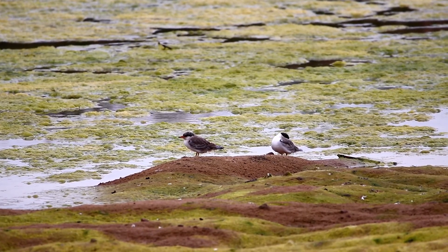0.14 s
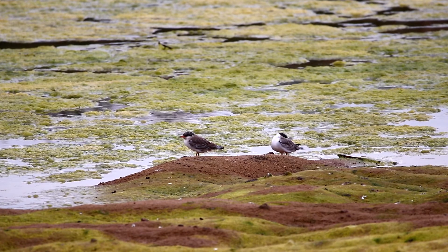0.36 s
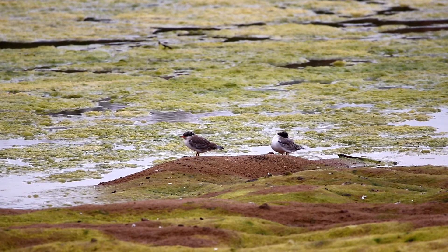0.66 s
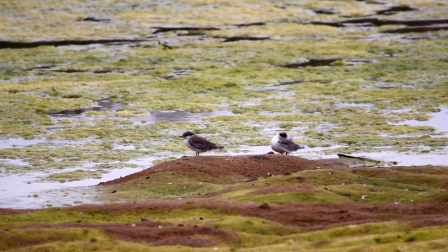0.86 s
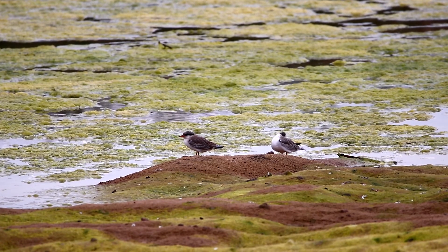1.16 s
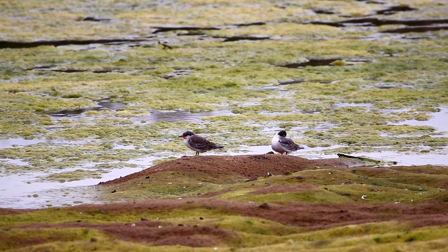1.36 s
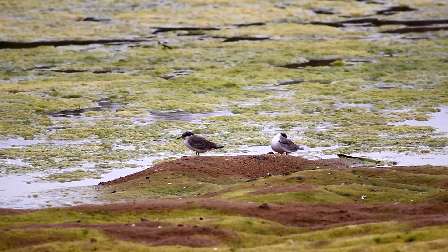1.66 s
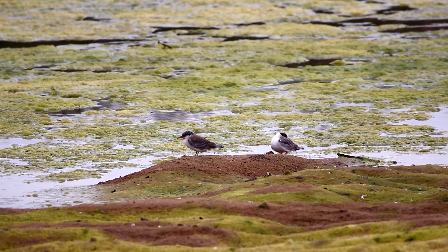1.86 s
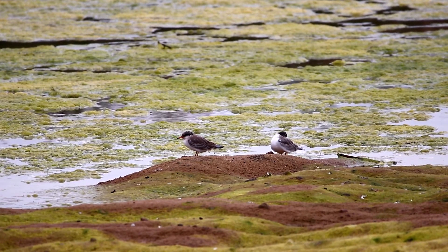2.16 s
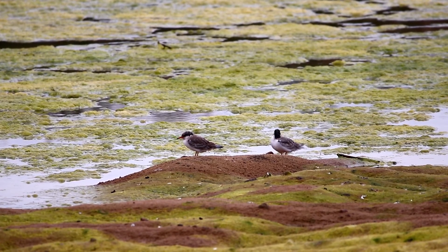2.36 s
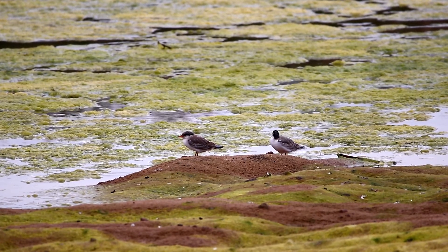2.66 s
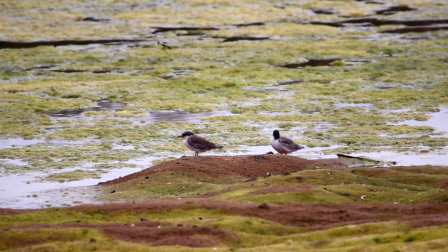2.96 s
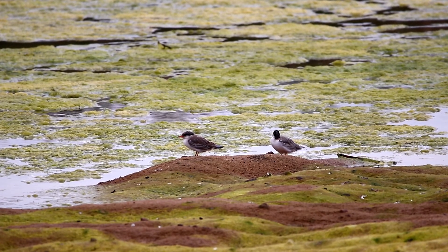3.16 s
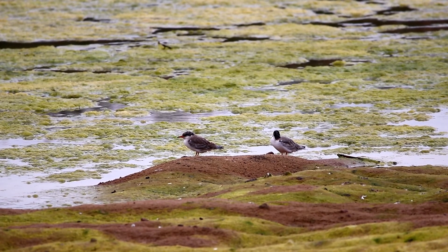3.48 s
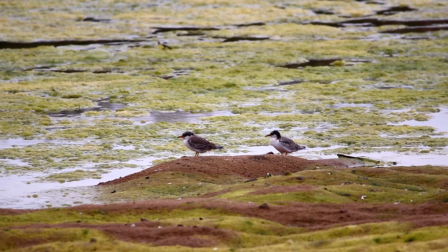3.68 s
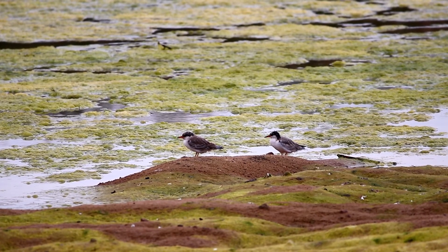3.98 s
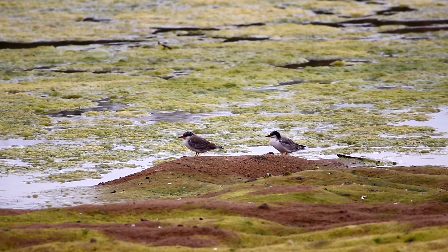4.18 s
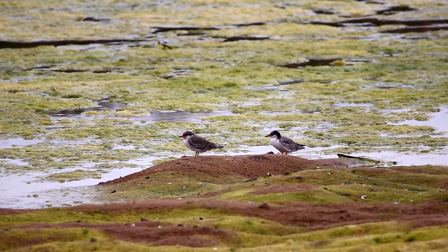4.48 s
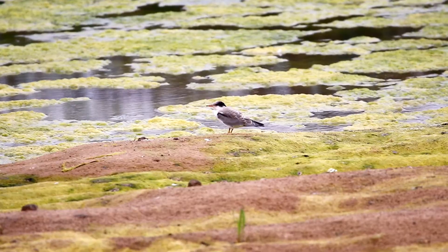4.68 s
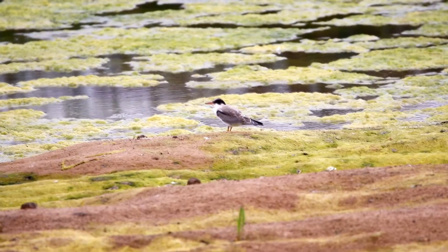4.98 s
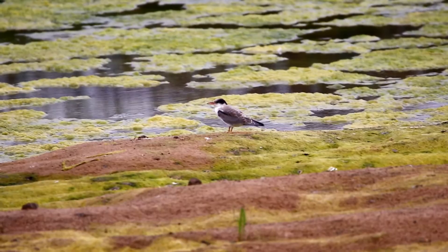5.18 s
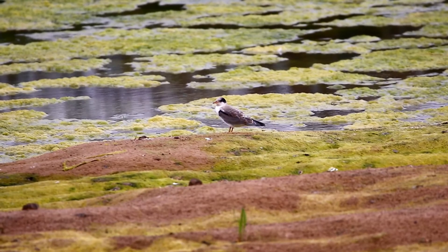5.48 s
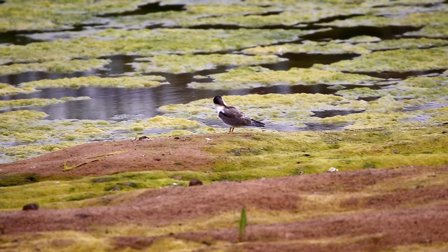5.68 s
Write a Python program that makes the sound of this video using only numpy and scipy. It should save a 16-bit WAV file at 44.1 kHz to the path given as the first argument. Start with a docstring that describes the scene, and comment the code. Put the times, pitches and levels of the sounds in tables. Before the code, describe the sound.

From the start, strong wind buffets the microphone: a deep ragged rumble with fluttering and dull thumps, heaviest during the first 1.5 seconds and leaning left as it eases after 3 seconds. Through it, several terns on a shallow, weedy lagoon call constantly and overlap, with very short notes under a tenth of a second, rising slightly then falling or cracking downward, some clear, some rasping, mostly slightly right, with one clearer bird left. Two faint thin whistles come near 1.4 seconds. At about 4.6 seconds the wind abruptly drops, exposing faint open-air hiss and light echo from the shore. A wavering cry starts at 4.7, with a close scrape and hollow snap around 4.75 and tiny ticks at 4.86. Growls and a short croak follow around 4.9 to 5.7, among more chirps. Small soft wind puffs flick left and right from 5.1 until the end near 6 seconds.

```python
"""Wind buffeting two microphone ports is heard first, with terns calling at once over a shallow lagoon.
The calls are harmonic stacks: short arched notes that fall or crack, whistles, a cry, a croak and growls.
The wind is shaped noise with thumps; it drops away after four and a half seconds and returns in small puffs.
In the lull come close clicks, noise bursts ringing a hollow body, over a faint open-air hiss."""
import sys
import numpy as np
from scipy import signal
from scipy.fft import rfft, irfft
from scipy.io import wavfile
from scipy.ndimage import uniform_filter1d, map_coordinates

SR = 44100
rng = np.random.default_rng(int(sys.argv[2]) if len(sys.argv) > 2 else 0)


def wav_out(sig):
    """Save sig, one row per channel (or a flat mono array), as 16-bit PCM at SR to the path in sys.argv[1]."""
    wavfile.write(sys.argv[1], SR, np.round(np.clip(np.atleast_2d(sig).T, -1, 1) * 32767).astype(np.int16))


N = 257544
T = np.arange(N) / SR
TOP_HZ = 15700


def undb(db):
    """Decibels to gain."""
    return 10 ** (np.asarray(db) / 20)


def unit(x):
    """Scale to rms 1."""
    return x / np.sqrt(np.mean(x ** 2) + 1e-18)


def gain_at(hz, points):
    """Gain of a (f/Hz, level/dB) spectrum at any frequency, interpolated over log frequency."""
    f, db = np.transpose(points)
    return undb(np.interp(np.log(hz + 1e-3), np.log(f), db))


def noise(points, size=N, weight=lambda hz: 1):
    """Noise of a given colour, rms 1."""
    hz = np.fft.rfftfreq(size, 1 / SR)
    spectrum = rfft(rng.standard_normal(size)) * gain_at(hz, points) * weight(hz)
    return unit(irfft(spectrum, size))


def wobble(rate_hz, size=N):
    """Smooth random curve with a spread near 1: a spline through rate_hz random points a second."""
    place = np.arange(size) * rate_hz / SR
    return map_coordinates(rng.standard_normal(size // 8 + 4), [place], order=3, mode="wrap")


def decay(t, t60):
    """Exponential decay that falls by 60 dB in t60 seconds."""
    return np.exp(-np.log(1000) * t / t60)


def sides(pan_db):
    """Left and right gains for a level difference, left minus right."""
    return undb(np.array([[1], [-1]]) * pan_db / 2)


def shares(pan_db):
    """Left and right gains for a level difference, with a mean of 1."""
    return sides(pan_db) / sides(pan_db).mean(axis=0)


def add(out, start, sound):
    """Mix a sound in at a time in seconds."""
    i = max(int(start * SR), 0)
    out[:, i:i + sound.shape[-1]] += sound[..., :N - i]


# the resonance that is left when the beak closes: (f/Hz, level/dB)
CLOSED_BEAK = [(1000, -4), (1700, -6), (2200, 0.5), (2600, 3.5), (2950, 4.5), (3600, -7.5), (4600, -9),
               (6000, -12.5), (9000, -11), (15000, 9)]
# colour of the rough hiss in a call: (f/Hz, level/dB)
RASP = [(800, -10.5), (1200, -2), (1800, -13), (2400, -2), (3000, 0), (3800, -5.5), (4800, -6.5),
        (6500, -27), (14000, -33)]


def syrinx(hz, rasp, closing, throat, lag_ms, jitter=0.055, jitter_hz=700,
           shimmer=0.95, shimmer_hz=1100, hiss_db=-8, split=0.48):
    """A harmonic stack through throat and closing beak, one row per port.

    Rasp shakes pitch and strength, makes cycles alternate strong and weak, and adds hiss.
    """
    size = len(hz)
    hz = hz * (1 + jitter * rasp * wobble(jitter_hz, size))
    k = np.arange(1, 13)[:, None]  # harmonic numbers
    partials = gain_at(k * hz, throat) * gain_at(k * hz, CLOSED_BEAK) ** closing
    partials = partials * (k * hz < TOP_HZ)
    partials = partials / np.sqrt(np.mean(np.sum(partials ** 2, axis=0)) / 2)
    turns = np.cumsum(hz) / SR + rng.random()
    # the left port hears the call lag_ms after the right
    ports = np.array([np.sum(partials * np.sin(2 * np.pi * k * (turns - hz * lag)), axis=0)
                      for lag in (lag_ms * 1e-3, 0)])
    ports = ports * (1 + split * rasp * np.cos(np.pi * turns))
    ports = ports * (1 + shimmer * rasp * wobble(shimmer_hz, size))
    return ports + undb(hiss_db) * rasp * noise(RASP, size)


# short notes: (start t/s, length t/s, top pitch f/Hz, level/dB, rasp [0-1], bird)
NOTES = [ (0.066, 0.07, 1777, -40.5, 0.5, "clear"), (0.147, 0.0742, 1825, -36.5, 0.85, "sharp"),
         (0.271, 0.066, 1422, -41.5, 0.9, "low"), (0.433, 0.081, 1730, -38, 0.5, "sharp"),
         (0.464, 0.075, 1620, -40, 0.5, "deep"), (0.617, 0.072, 1296, -38.5, 0.86, "low"),
         (0.618, 0.041, 1723, -38, 0.5, "clear"), (0.901, 0.074, 1766, -37.5, 1, "sharp"),
         (0.921, 0.064, 1746, -37, 0.15, "clear"), (1.122, 0.077, 1403, -40, 0.65, "low"),
         (1.148, 0.084, 1627, -41, 0.45, "deep"), (1.195, 0.077, 1780, -36, 0.62, "sharp"),
         (1.557, 0.073, 1445, -40.5, 0.65, "low"), (1.621, 0.081, 1640, -39, 0.25, "deep"),
         (1.724, 0.0736, 1730, -38, 0.9, "sharp"), (1.84, 0.067, 1770, -38.5, 0.44, "clear"),
         (2.015, 0.067, 1393, -42, 0.75, "low"), (2.502, 0.07, 1776, -37, 0.78, "sharp"),
         (2.676, 0.061, 1270, -42, 0.47, "low"), (2.833, 0.072, 1780, -39, .25, "clear"),
         (2.874, 0.071, 1832, -33.5, 0.6, "sharp"), (3.2, 0.07, 1432, -40, 0.68, "low"),
         (3.506, 0.068, 1750, -34.5, 0.8, "sharp"), (3.677, 0.074, 1445, -38, 0.83, "low"),
         (3.782, 0.07, 1795, -40.5, 0.6, "clear"), (4.206, 0.073, 1756, -36.5, 0.98, "sharp"),
         (4.349, 0.074, 1460, -39.5, 1, "low"), (4.474, 0.067, 1752, -41.5, 0.7, "clear"),
         (4.69, 0.054, 1143, -37, 0.24, "low"), (4.878, 0.076, 1695, -36, 0.6, "mellow"),
         (4.974, 0.0756, 1616, -57, 0.15, "mellow"), (5.042, 0.041, 1687, -44, 0.3, "mellow"),
         (5.236, 0.0802, 1761, -36, 0.29, "mellow"), (5.263, 0.048, 1162, -35, 0.33, "low"),
         (5.609, 0.065, 1777, -54, 0.2, "mellow"), (5.655, 0.076, 1725, -37.5, 0.6, "mellow")]
# each bird and where it sits: (time to the top of the arch t/s, left minus right level/dB,
#   lag of the left port [ms], level/dB at the start of a note and at its end, both relative to its top,
#   treble tilt [dB per octave], throat colour [(f/Hz, level/dB)])
BIRDS = { "clear": (0.0243, 4.2, -0.084, -7.5, -18, 0, [(1100, 8), (1750, 2.5), (2700, 1.5), (3500, 2),
         (5300, 2.5), (7000, -1), (8200, -14), (12300, -16.5), (15000, -33)]),
         "sharp": (.0235, -8, 0.13, -11, -16, -.6, [(1000, -3), (1750, -2), (2700, 6), (3500, 7.5),
         (4400, 3.5), (5300, 2), (7000, -2.5), (8600, -16.5), (12300, -13.5), (15000, -58)]),
         "deep": (0.018, -5.5, 0.088, -5, -10.5, -.6, [(1000, -3), (1650, -3), (2700, 3.5), (3300, 6),
         (4300, 11), (4900, 2), (6500, -1), (8600, -17), (12300, -18), (15000, -50)]),
         "low": (0.022, -5.5, 0.11, 0.65, -14, 7.58, [(1000, 12.5), (1450, 4.5), (2400, 7), (3000, 10),
         (3600, 11.5), (4300, 0), (5100, -1), (5800, -2), (7200, -16.5), (8500, -25), (12000, -28.5),
         (15000, -62)]), "mellow": (.028, -2.3, -0.0309, -7, -13, 1.4, [(1100, 5), (1700, 3), (3400, 2.5),
         (5100, -6.5), (6800, -2.5), (8500, -19), (12000, -19), (15000, -34)])}
# pitch through each bird's note: (place [-1 start, 0 top, 1 end], share of the top pitch [0-1]);
# the sharp bird cracks down by about a fifth
ARCHES = { "clear": [(-0.99, .84), (-.6, .94), (-0.23, .995), (0.062, 1), (.3, 0.96), (.55, .88),
          (0.88, .62)], "sharp": [(-1, .89), (-.62, .91), (-.25, .985), (0.04, 1), (.17, 0.97), (.27, .85),
          (.33, .68), (.55, .63), (0.8, .51), (1, .45)], "deep": [(-1, .88), (-0.59, 0.945), (-0.25, 0.99),
          (0.06, 1), (.27, 0.96), (.33, .88), (.37, 0.72), (0.55, .61), (1, .47)], "low": [(-1, .83),
          (-.52, .86), (-0.15, .985), (0.08, 1), (.22, 0.96), (.31, .83), (.42, 0.72), (0.6, .68),
          (1, 0.6)], "mellow": [(-1, .85), (-.6, .93), (-0.26, .985), (0.03, 1), (.25, 0.96), (.5, .84),
          (0.95, .6)]}
# hoarseness of a note: (at its top, added at the start, added in the fall) [each 0-1]
HOARSE = (.15, .33, .4)
# a note that is pushed harder is also brighter
USUAL_NOTE_DB, BRIGHTEN_DB_PER_OCTAVE_PER_DB = -36.5, .5


def short_notes(attack_s=0.0033, release_s=.009, fall_at=0.4, fall_db=-0.5, closing_rate=1.67, half_open=0.39):
    """Each note starts hoarse, clears as it arches in pitch, then falls away as the beak closes."""
    out = np.zeros((2, N))
    top_rasp, onset_rasp, tail_rasp = HOARSE
    for start, length, hz, db, rasp, bird in NOTES:
        rise_s, pan_db, lag_ms, start_db, end_db, tilt_db, throat = BIRDS[bird]
        t = np.arange(int(length * SR)) / SR
        place = np.interp(t, [0, rise_s, length], [-1, 0, 1])
        opening = .5 - .5 * np.tanh((place + .5) * 10)
        tail = .5 + .5 * np.tanh((place - fall_at) * 10)
        arch = np.interp(place, *np.transpose(ARCHES[bird]))
        pitch = hz * uniform_filter1d(arch, size=120)

        bright_db = tilt_db + BRIGHTEN_DB_PER_OCTAVE_PER_DB * (db - USUAL_NOTE_DB)
        colour = [(f, d + bright_db * np.log2(f / 3000)) for f, d in throat]
        closing = np.clip(closing_rate * place, 0, 1.3) + half_open * opening
        fall_rasp = tail_rasp * (tail + np.clip(place, 0, 1) ** 2)
        rough = rasp * (top_rasp + onset_rasp * opening + fall_rasp)

        gate = np.clip(t / attack_s, 0, 1) * np.clip((length - t) / release_s, 0, 1)
        arch_db = np.where(place < 0, start_db, end_db) * place ** 2
        effort = undb(db + arch_db + fall_db * rasp * tail)
        call = syrinx(pitch, rough, closing, colour, lag_ms)
        add(out, start, call * gate * effort * sides(pan_db))
    return out


# drawn-out calls: (start t/s, length t/s, glide to the held pitch t/s, first f/Hz, held f/Hz, last f/Hz,
#   attack t/s, level/dB, rasp [0-1], trill rate f/Hz, trill depth [0-1], colour)
DRAWLS = [ (1.347, 0.088, 0.031, 3866, 3830, 2287, .045, -51, 0.1, 60, .02, "whistle"),
          (1.476, 0.057, .02, 2970, 3230, 2320, 0.018, -52.5, 0.11, 60, .03, "whistle"),
          (4.669, 0.25, 0.059, 1250, 1688, 1493, 0.1, -42, 0.27, 70.7, 0.28, "cry"),
          (4.867, 0.21, 0.04, 1598, 1172, 1142, 0.0167, -44, 0.67, 150.6, 0.2, "growl"),
          (5.066, 0.035, 0.01, 1080, 1140, 1036, 0.0048, -41.5, 0.47, 79.5, 0, "croak"),
          (5.455, 0.061, 0.02, 652, 698, 761, 0.022, -50, 0.42, 70, 0.1, "growl"),
          (5.497, 0.11, 0.061, 1078, 1196, 1184, 0.026, -47, 0.45, 67.5, 0.6, "growl"),
          (5.593, 0.14, 0.021, 1120, 1145, 1090, 0.019, -47, 0.5, 92.4, 0.25, "growl")]
# throat colour of each kind of call: (f/Hz, level/dB)
DRAWL_COLOURS = { "whistle": [(2400, 2), (3100, 6), (4000, -4), (6000, -25.5), (15000, -50)],
                 "cry": [(1200, -4), (1650, -4.5), (3250, 3), (4900, -17), (7000, -28), (15000, -38)],
                 "growl": [(1150, -11), (1450, 7), (2300, 4), (3500, 4.5), (4700, -3.5), (5700, -16),
                 (9000, -21), (15000, -40)], "croak": [(1100, -10), (2200, 6), (3300, 1), (4400, -2),
                 (5600, -20), (15000, -34)]}
# uneven trill: (pitch bend at full depth, scatter of its rate, waver of the pitch at full rasp) [shares]
TRILL = (.05, .18, .012)


def drawn_calls(pan_db=-8.0, lag_ms=0.12, fade_share=0.24):
    """Whistles, a cry, a croak and growls swell, glide through a held pitch and waver with an uneven trill."""
    out = np.zeros((2, N))
    trill_bend, trill_scatter, waver = TRILL
    for start, length, climb, first, held, last, attack, db, rasp, trill_hz, depth, colour in DRAWLS:
        size = int(length * SR)
        t = np.arange(size) / SR
        trill_rate = trill_hz * (1 + trill_scatter * wobble(68.0, size))
        trill = 2 * np.pi * np.cumsum(trill_rate) / SR
        climbing = np.clip(1 - t / climb, 0, 1) ** 2
        leaving = np.interp(t, [climb, length], [0, 1])
        glide = held + (first - held) * climbing + (last - held) * leaving
        pitch = glide * (1 + trill_bend * depth * np.sin(trill) + waver * rasp * wobble(202.0, size))
        swell = np.sqrt(np.clip(t / attack, 0, 1)) * np.clip((1 - t / length) / fade_share, 0, 1)
        swell = swell * (1 + depth * np.cos(trill))
        call = syrinx(pitch, rasp, 0, DRAWL_COLOURS[colour], lag_ms)
        add(out, start, call * swell * undb(db) * sides(pan_db))
    return out


# colour of what the shore returns: (f/Hz, level/dB)
SHORE = [(800, -22), (2000, 7.5), (3000, -7), (4500, -0.5), (7000, 3), (14000, -6.5)]


def shore(calls, near_db=-14.0, near_t60=0.16, far_db=-28, far_t60=1.0, gap_s=0.00247,
          bank_db=-13, bank_s=.011, bank_lag_s=0.00134):
    """Mud and weed scatter the calls close in, a near bank echoes them, far banks return a faint tail."""
    t = np.arange(SR // 2) / SR
    out = calls.copy()
    for channel in range(2):
        for db, t60 in ((near_db, near_t60), (far_db, far_t60)):
            echo = noise(SHORE, len(t)) * decay(t, t60) * (t > gap_s)
            echo = echo / np.linalg.norm(echo)
            out[channel] += undb(db) * signal.fftconvolve(calls[channel], echo)[:N]
        # the late copy from the near bank beats against each falling glide
        late = np.interp(T - bank_s - channel * bank_lag_s, T, calls[channel], left=0)
        out[channel] += undb(bank_db) * uniform_filter1d(late, size=5)
    return out


# wind at the ports between buffets, until it drops: (t/s, level/dB)
GUST = [(0.0, -23.5), (0.18, -21.5), (0.28, -19.5), (0.42, -22), (0.8, -21), (0.96, -21.5), (1.14, -21),
        (1.36, -26), (1.5, -24), (1.74, -23), (2.04, -24), (2.22, -24.5), (2.45, -25.5), (2.84, -23),
        (3.02, -26), (3.56, -30.5), (4.08, -29.5), (4.16, -26.5), (4.5, -26.5), (4.58, -32), (4.66, -59)]
# the port that faces it: (t/s, left minus right level/dB)
WINDWARD = [(0.0, 5), (0.26, 6.5), (0.44, 1), (2.3, 6.5), (2.78, 11), (3.14, 15.5), (3.8, 10), (3.94, 17),
            (4.56, 2.5), (4.66, -35)]
# buffets that ride on the gust: (middle t/s, length t/s, rise level/dB)
BUFFETS = [(0, 0.041, 3), (0.113, 0.069, 4), (0.215, 0.018, 4.5), (0.268, 0.043, 1.5), (0.51, 0.041, 3),
           (0.599, 0.027, 3.5), (0.925, 0.056, 3.5), (0.989, 0.046, 3), (1.145, 0.13, 3.5),
           (1.224, 0.022, 6), (1.3, 0.029, 5), (1.423, 0.05, 6), (1.557, 0.073, 2), (1.839, 0.066, 1.5),
           (1.946, 0.062, 4), (2.034, 0.15, 5), (2.199, 0.016, 5), (2.326, 0.025, 5.5), (2.743, 0.031, 3),
           (2.83, 0.084, 1.5), (3.453, 0.056, 5), (3.63, 0.028, 4), (3.795, 0.014, 3), (3.893, 0.02, 3.5),
           (4.137, 0.067, 2), (4.466, 0.11, 2)]
# small puffs in the lull: (start t/s, length t/s, level/dB, left minus right level/dB)
PUFFS = [(5.122, 0.23, -35, 23), (5.221, 0.12, -34, 22), (5.297, 0.26, -37.5, -16), (5.485, 0.057, -40, 20),
         (5.578, 0.095, -43, -18), (5.715, 0.072, -33.5, -13)]
FULL_GUST_DB, LULL_DB = -21, -52


def airflow(puff_attack_s=0.016, surge_db=0.36, surge_hz=16, veer_db=2, veer_hz=12):
    """Level and left-right balance in dB: a gust with buffets, then a lull with puffs; it surges and veers."""
    gust = undb(np.interp(T, *np.transpose(GUST), right=LULL_DB))
    ports = gust * shares(np.interp(T, *np.transpose(WINDWARD)))
    for middle, length, rise_db in BUFFETS:
        hump = np.cos(np.pi * np.clip((T - middle) / length, -.5, .5))
        ports = ports * undb(rise_db * hump)
    for start, length, db, pan_db in PUFFS:
        puff = np.interp(T - start, [0, puff_attack_s, length], [0, 1, 0])
        ports = np.hypot(ports, undb(db) * puff * shares(pan_db))
    flow_db, balance_db = 20 * np.log10([ports.mean(axis=0), ports[0] / ports[1]])
    return flow_db + surge_db * wobble(surge_hz), balance_db + veer_db * wobble(veer_hz)


# colour of the turbulence at the microphone: (f/Hz, relative level/dB per Hz)
WIND = [(12, -48), (20, -23), (53, 2.5), (92, 2), (182, -1.5), (237, -1.5), (387, -11.5), (487, -21),
        (709, -36.5), (1000, -47), (1300, -67), (2200, -120)]


def port_pair(weight, likeness):
    """Turbulence partly shared by the two ports, with its slow swells evened out."""
    shared, c = noise(WIND, weight=weight), np.clip(likeness, 0, 1)
    pair = np.array([np.sqrt(c) * shared + np.sqrt(1 - c) * noise(WIND, weight=weight)
                     for _ in range(2)])
    power = uniform_filter1d(pair.mean(axis=0) ** 2, size=2000)
    return pair / np.sqrt(uniform_filter1d(power, size=1000) + 1e-9)


# level of the deepest sway of the air: (t/s, level/dB)
SWAY = [(0, -33), (.35, -31), (.6, -41), (.9, -39), (1.15, -31.5), (1.5, -34), (2.5, -39), (3.3, -38),
        (3.5, -33.5), (4.25, -34.5), (4.55, -34), (4.7, -44.5), (5.05, -50), (5.2, -43.5), (5.8, -47.5)]


def wind(split_hz=180, deep_hz=68, edge_hz=950, rumble_db=-3.0, flutter_db=-7, flicker_db=2.5,
         buffet_db=0.05, buffet_hz=22, rumble_pan_db=-2.5, flutter_pan_db=5, spray_db=-17,
         spray_flicker_db=7, flutter_growth=0.92, spray_growth=2.3, slack_limit_db=-17):
    """A deep sway, a rumble, and a ragged flutter that follows the windward port and spits in the gusts."""
    def below(hz, edge):
        return 1 / (1 + (hz / edge) ** 4)

    flow_db, pan_db = airflow()
    deep = port_pair(lambda hz: below(hz, deep_hz), likeness=0.93)
    rumble = port_pair(lambda hz: (1 - below(hz, deep_hz)) / np.hypot(1, (hz / split_hz) ** 4), likeness=0.73)
    flutter = port_pair(lambda hz: (1 - below(hz, split_hz)) * below(hz, edge_hz), likeness=0.41)
    spray = noise([(200, -1.0), (450, 0.5), (700, -5.5), (1100, -22.5), (2000, -41), (5000, -70)])

    # small eddies grow faster than the gust itself, and the smallest come in brief spurts
    small_db = np.maximum(flutter_growth * (flow_db - FULL_GUST_DB), slack_limit_db)
    gust_db = np.maximum(np.interp(T, *np.transpose(GUST)) - FULL_GUST_DB, slack_limit_db)
    spurts_db = spray_flicker_db * np.tanh(wobble(130))
    spray = spray * undb(spray_db + spurts_db + spray_growth * gust_db)

    flutter = flutter * undb(flicker_db * wobble(70)) + spray
    flutter = flutter * undb(buffet_db * wobble(buffet_hz))
    flutter = flutter * undb(flow_db + small_db + flutter_db) * shares(pan_db + flutter_pan_db)
    rumble = rumble * undb(flow_db + rumble_db) * shares(pan_db + rumble_pan_db)
    sway = deep * undb(np.interp(T, *np.transpose(SWAY)))
    return sway + rumble + flutter


# the biggest eddies that thump the ports: (t/s, level/dB before the common thump_db)
THUMPS = [(.065, -13), (.218, -2.5), (0.246, -4), (0.263, -2.5), (0.319, -8.5), (.341, -10), (.363, -15),
          (0.473, -7.5), (.598, -11), (.686, -8.5), (0.715, -13), (.796, -19), (.903, -7), (.933, -3.5),
          (1.021, -12), (1.047, -11), (1.117, -13), (1.153, -13), (1.223, -14), (1.296, -17), (1.387, -16),
          (1.426, -12), (1.55, -9), (1.647, -9), (1.841, -21), (2.143, -17.5), (2.198, -12), (2.324, -14.5),
          (2.646, -13.5), (2.749, -18), (2.835, -17), (4.126, -19), (4.152, -19), (4.452, -21.5)]


def thumps(width_s=0.00081, thump_db=-7.0, pan_db=7):
    """An eddy crossing the ports: a brief suction between two soft pushes."""
    out = np.zeros((2, N))
    t = np.arange(-400, 400) / SR
    u = t / width_s
    pulse = (u ** 2 - 1) * np.exp(-u ** 2 / 2)
    for s, db in THUMPS:
        add(out, s + t[0], pulse * undb(db + thump_db) * sides(pan_db))
    return out


# clicks close to the microphone: (t/s, level/dB, 60 dB decay t/s, body relative level/dB)
CLICKS = [(4.7465, -30.5, 0.009, -26), (4.7488, -38, 0.055, -26), (4.7538, -27, 0.019, -28),
          (4.7561, -34.5, 0.064, -22), (4.7585, -21.5, 0.011, -30), (4.7595, -32, 0.009, 14),
          (4.8584, -38, .008, -22), (4.862, -31, 0.0096, -24), (4.865, -33.5, 0.0085, -20)]
# colour of the snap: (f/Hz, level/dB)
CLICK_SNAP = [(300, -1.5), (900, -5), (2000, -4), (5000, -7.5), (9000, -2.5), (13000, -2.5), (16000, -14.5)]
# the hollow body that the clicks ring: (f/Hz, relative level/dB, 60 dB decay t/s)
CLICK_BODY = [(438, -21, 0.028), (1210, -34, 0.0085), (1520, -11, 0.021), (1690, 1, 0.011),
              (1900, -4.5, 0.016), (2460, -23, .008), (3220, -12, 0.0133)]


def clicks(pan_db=-10, body_pan_db=-3, body_level_db=3, body_attack_s=0.00047):
    """A brief scrape on the right that ends in a snap with a hollow body, then a few small ticks."""
    out, size = np.zeros((2, N)), 4096
    t = np.arange(size) / SR
    body = sum(undb(db + body_level_db) * np.cos(2 * np.pi * hz * t) * decay(t, t60)
               for hz, db, t60 in CLICK_BODY)
    body = body * (1 - np.exp(-t / body_attack_s))
    for s, db, t60, body_db in CLICKS:
        snap = np.array([noise(CLICK_SNAP, size) for _ in range(2)]) * decay(t, t60)
        click = snap * sides(pan_db) + undb(body_db) * body * sides(body_pan_db)
        add(out, s, click * undb(db))
    return out


# open air behind everything: (f/Hz, relative level/dB per Hz)
AIR = [(30, 18), (90, 27.5), (200, 22.5), (600, 18.5), (1100, 13.5), (2000, 8), (3200, 5), (4800, -0.5),
       (7000, 1), (10000, 1.5), (13000, -3.5), (14200, -10), (16000, -22)]
AIR_DB, LULL_RISE_DB = -50.5, 0.5


def air(pan_db=-2.5, shared_db=-3, waver_db=-1.0):
    """Smooth hiss of open water, partly shared by the ports, a little stronger once the wind has dropped."""
    hiss = unit(np.array([noise(AIR) for _ in range(2)]) + undb(shared_db) * noise(AIR))
    lull_db = np.interp(T, [4.4, 4.65], [0, LULL_RISE_DB])
    return hiss * sides(pan_db) * undb(AIR_DB + lull_db + waver_db * wobble(8.2))


def scene():
    """Birds across the water, wind and clicks at the microphone, open air behind."""
    birds = shore(short_notes() + drawn_calls())
    return birds + wind() + thumps() + clicks() + air()


def record(dry):
    """The scene fades in over 3 ms; the microphone chain cuts the top steeply above TOP_HZ."""
    top_cut = signal.ellip(8, .2, 70, TOP_HZ, fs=SR, output="sos")
    return signal.sosfilt(top_cut, dry * np.clip(T / .003, 0, 1))


dry = scene()
out = record(dry)
wav_out(out)
```